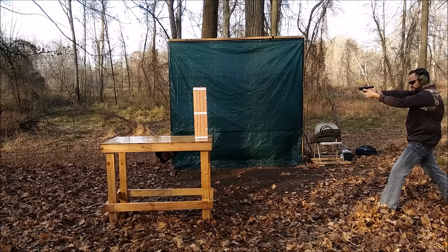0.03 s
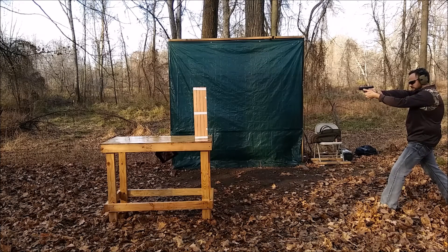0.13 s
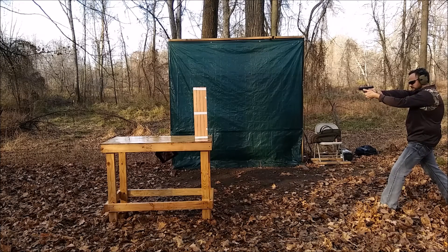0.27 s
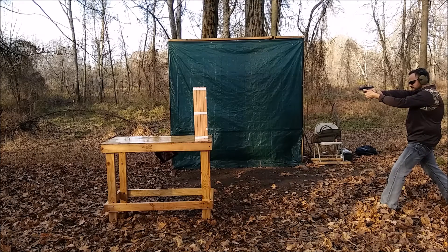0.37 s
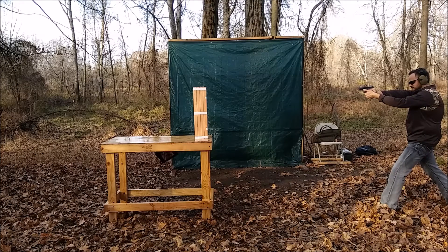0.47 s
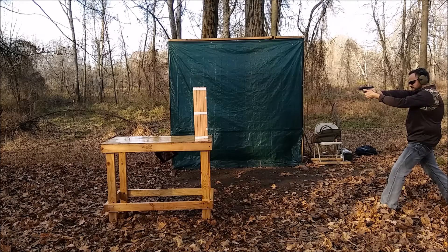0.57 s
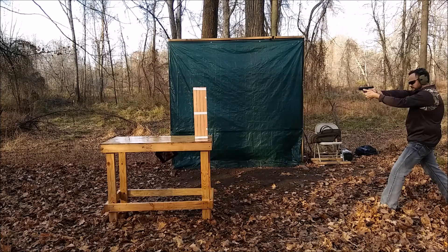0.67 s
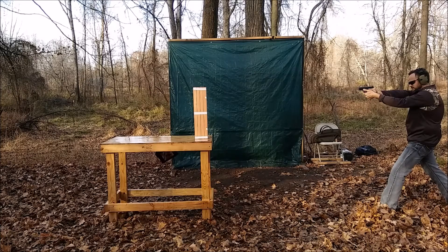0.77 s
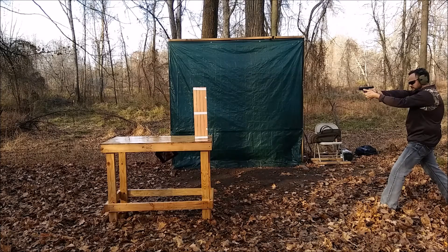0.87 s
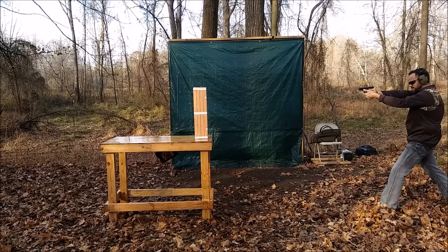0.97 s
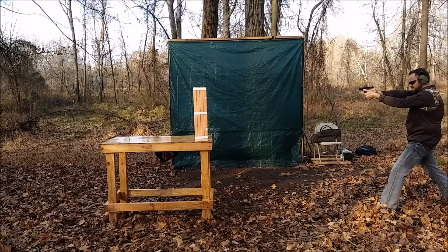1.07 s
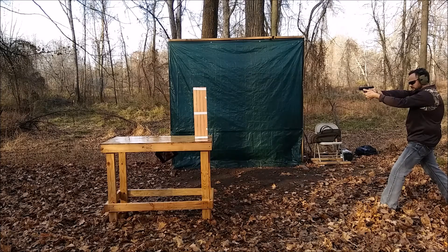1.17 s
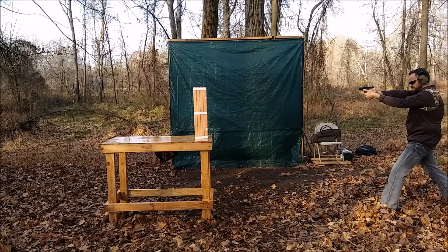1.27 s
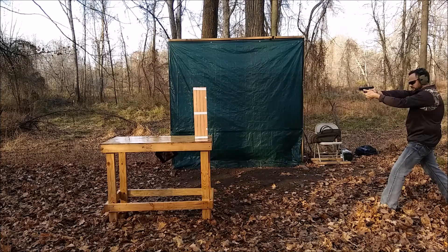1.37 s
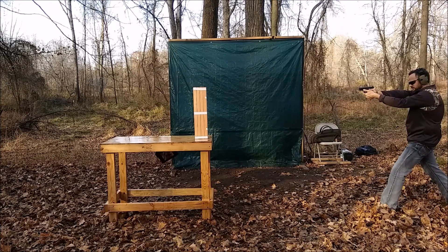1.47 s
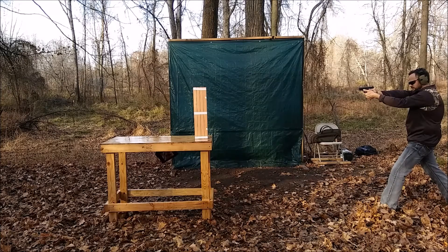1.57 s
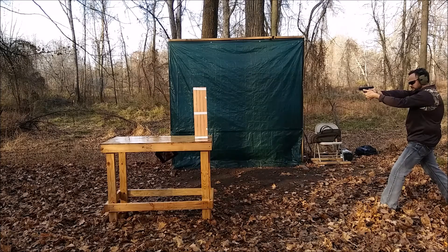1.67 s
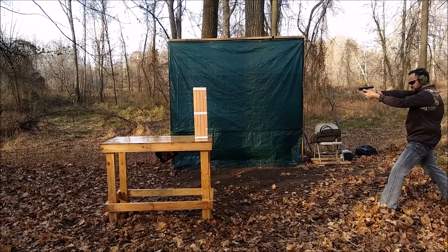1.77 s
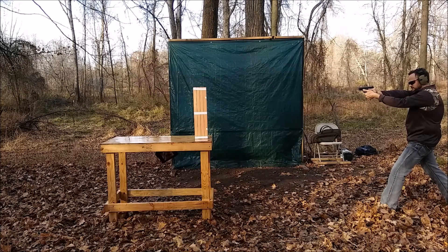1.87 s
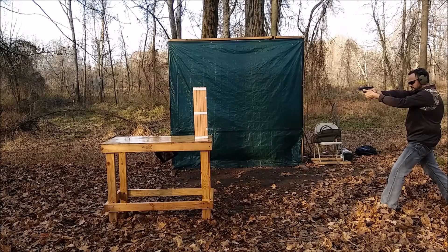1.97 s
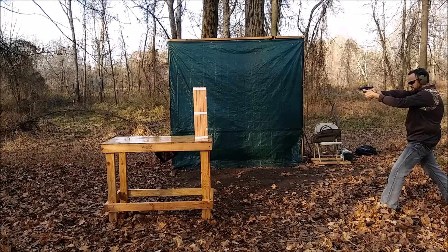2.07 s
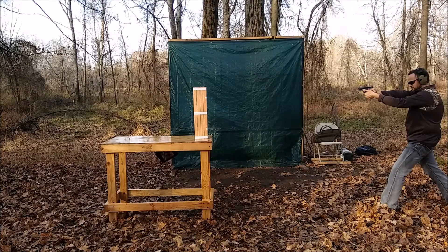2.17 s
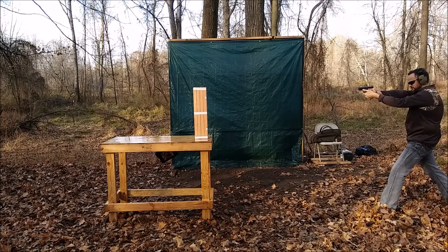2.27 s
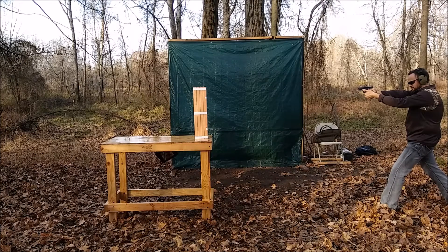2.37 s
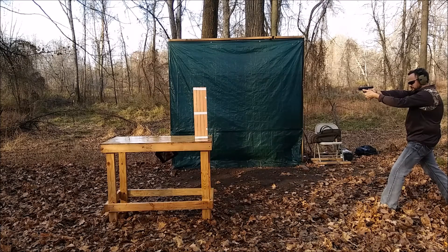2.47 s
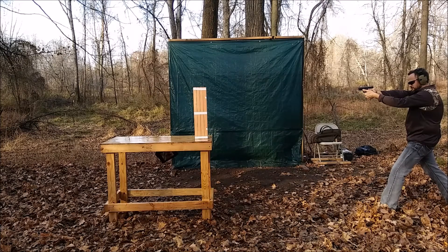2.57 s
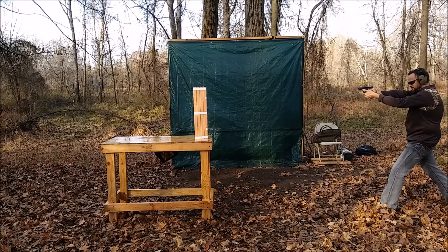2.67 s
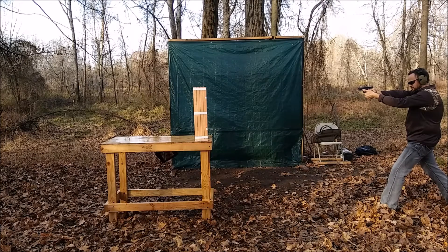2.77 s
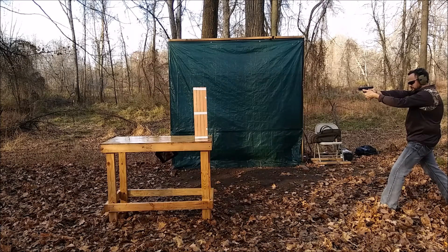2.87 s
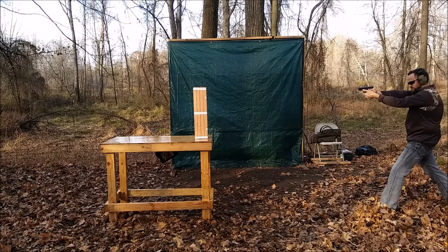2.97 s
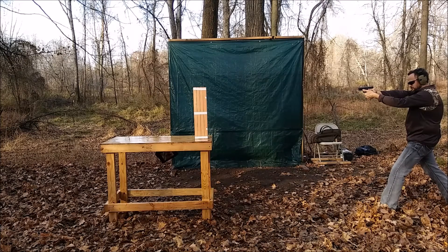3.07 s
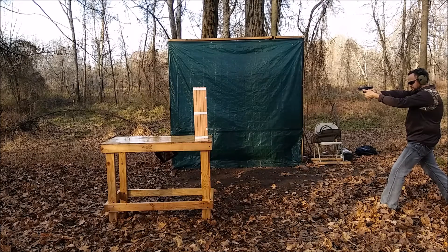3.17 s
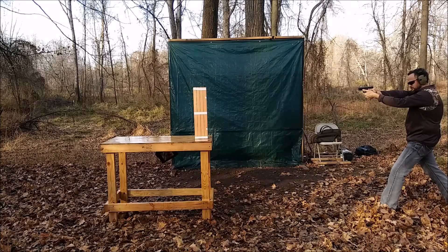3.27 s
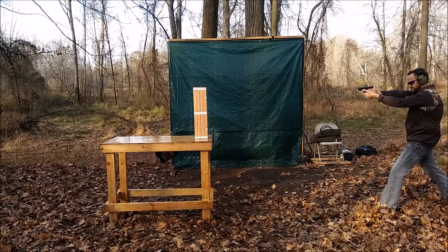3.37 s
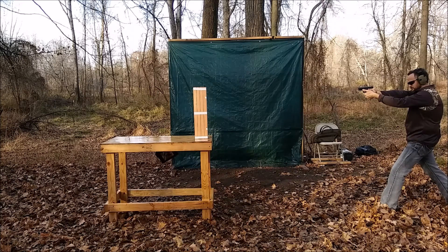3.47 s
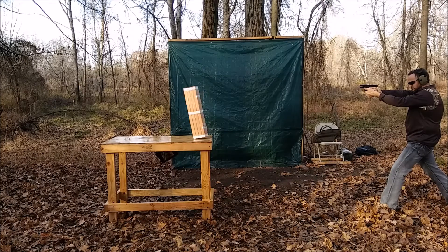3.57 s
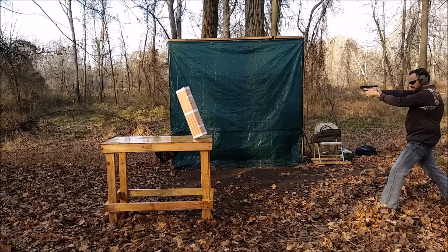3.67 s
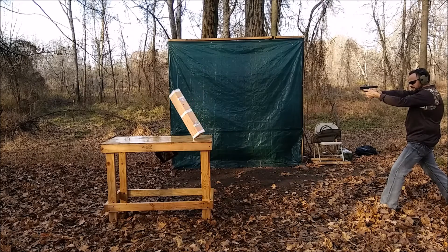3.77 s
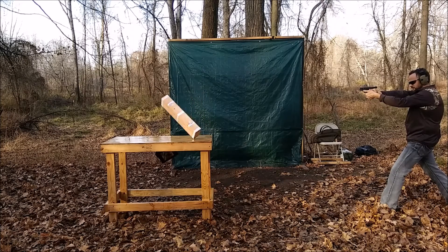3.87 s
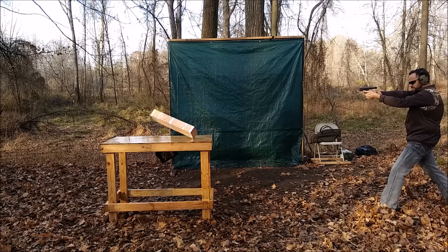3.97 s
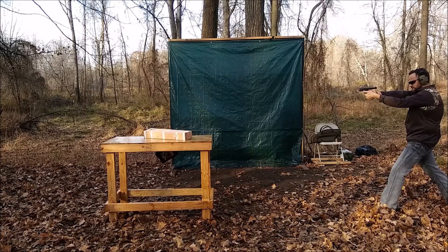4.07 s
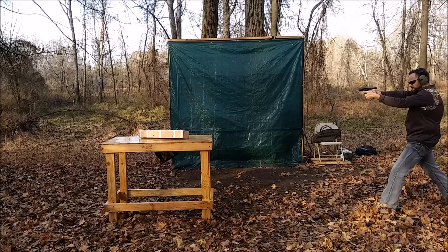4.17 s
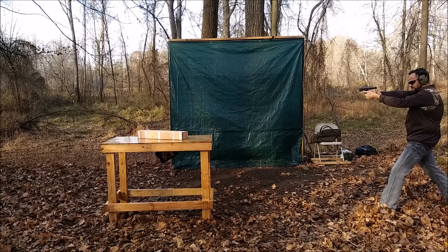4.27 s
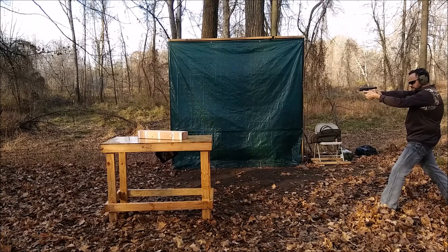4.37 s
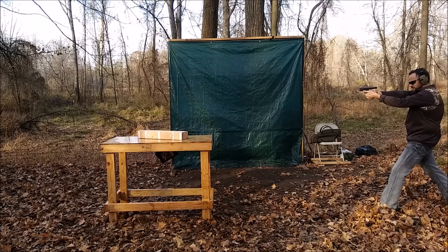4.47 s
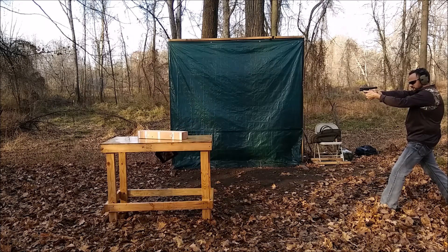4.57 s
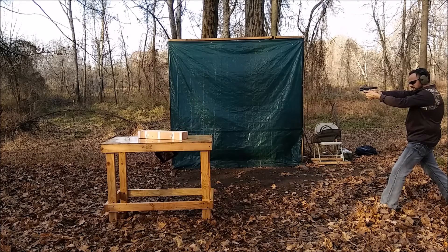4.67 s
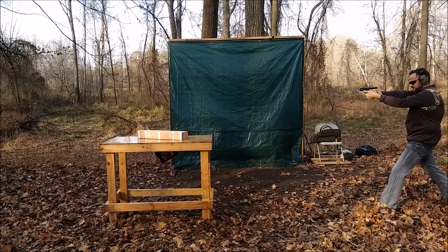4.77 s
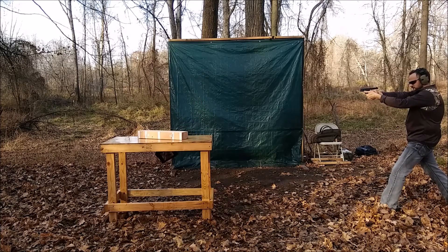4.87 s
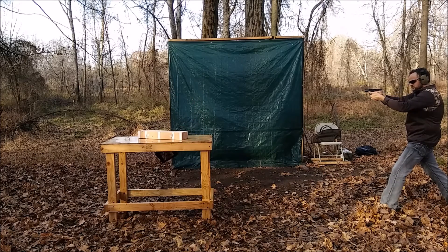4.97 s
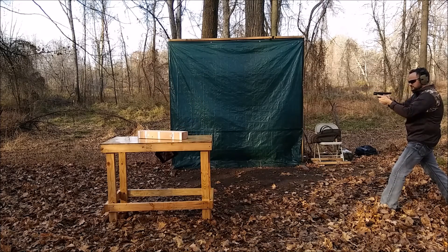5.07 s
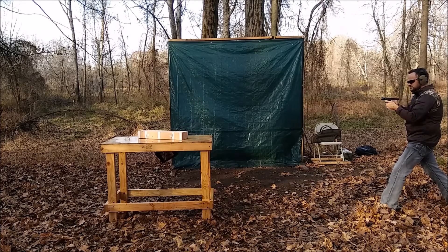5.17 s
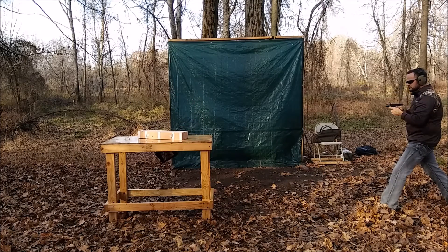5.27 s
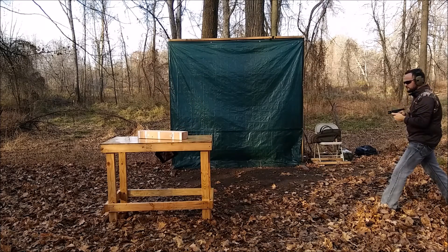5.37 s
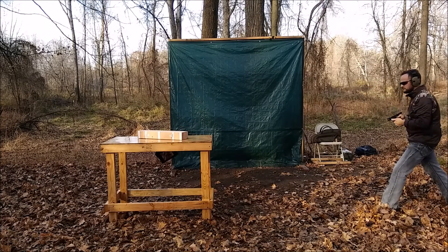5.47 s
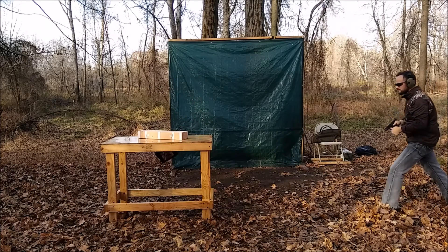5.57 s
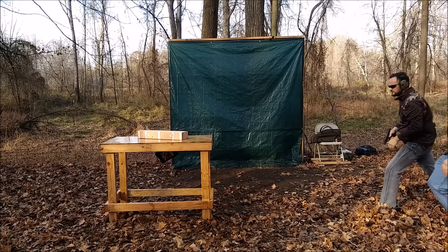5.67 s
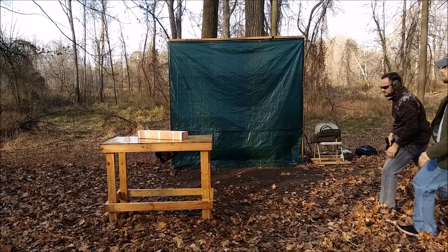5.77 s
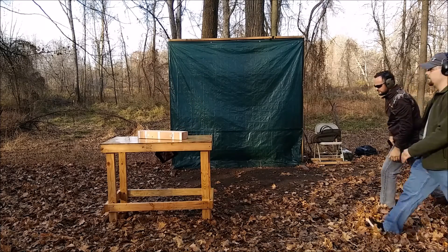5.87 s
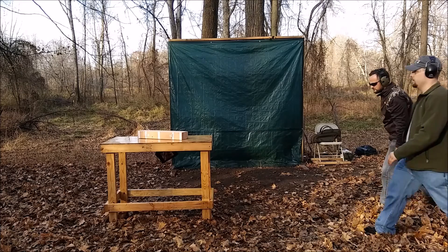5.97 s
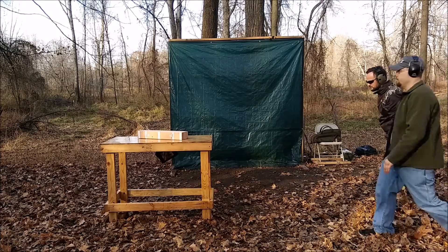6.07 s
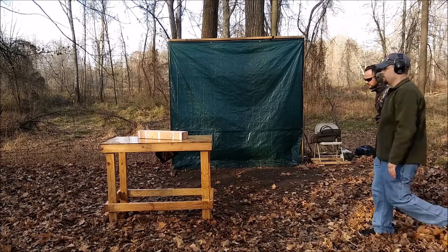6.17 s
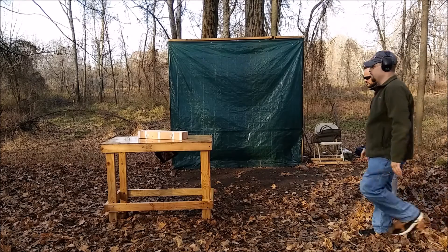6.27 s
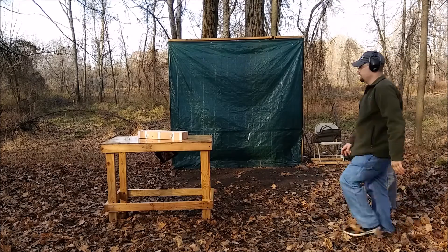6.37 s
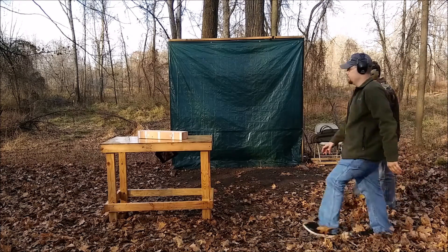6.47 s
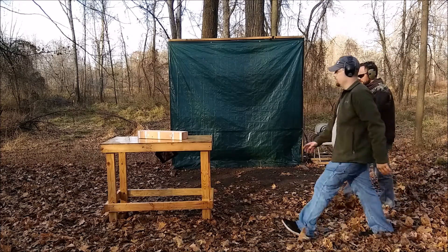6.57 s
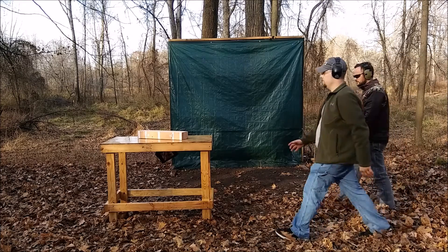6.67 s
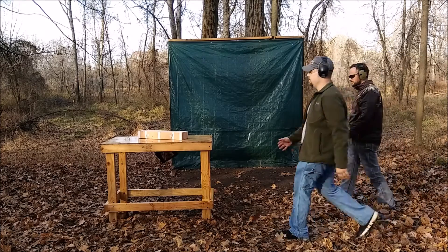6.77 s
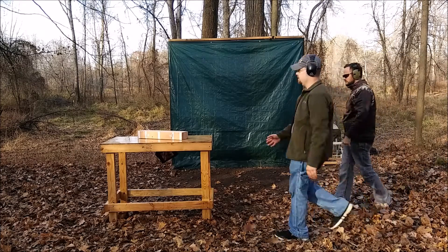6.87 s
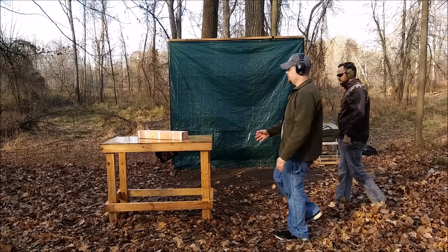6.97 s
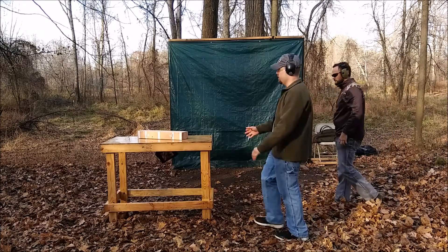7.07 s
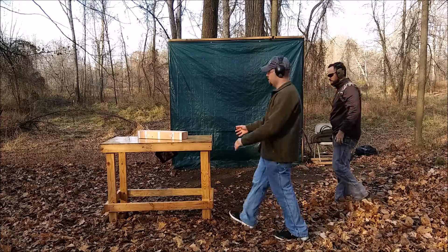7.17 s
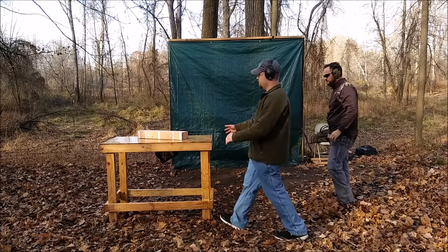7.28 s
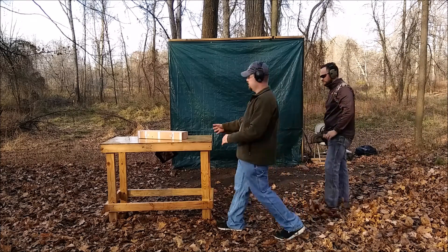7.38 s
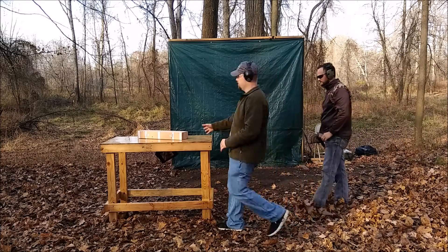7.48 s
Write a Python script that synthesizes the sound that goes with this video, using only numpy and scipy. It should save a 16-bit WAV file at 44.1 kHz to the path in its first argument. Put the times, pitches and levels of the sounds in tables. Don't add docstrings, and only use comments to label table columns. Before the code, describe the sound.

For the first 3.6 seconds a bare wood is almost silent: low still air, faint electronic hiss and a thin steady high buzz from the camera, soft puffs stirring dry leaves, and sparse tiny ticks. At about 3.6 s a single handgun shot bursts out, extremely loud and flattened by the overloaded microphone, with a short low thump. Dense bright echoes from near trunks follow at once, dulling as they decay, while a midrange roll returns from far trees and fades over the next second or more. At 4.2 s a stack of boards topples onto a wooden table: a bright slap, tightly bunched clacks and low thuds, small bounces until 4.4 s. From about 4.7 s leaves rustle lightly; by 5.9 s footsteps crunch and crackle clearly through dry litter, with twig snaps around 6.4 to 6.6 s, a lull near 7 s, then louder scuffs to the end.

```python
import sys
import numpy as np
from scipy import signal
from scipy.fft import rfft, irfft
from scipy.io import wavfile
from scipy.ndimage import uniform_filter1d

SR = 44100
rng = np.random.default_rng(int(sys.argv[2]) if len(sys.argv) > 2 else 0)


def undo_db(level):
    steps = np.asarray(level, float) / 20
    return 10 ** steps


def file_out(sig):
    cols = np.atleast_2d(sig).T
    lim = np.clip(cols, -1, 1)
    pcm = np.round(lim * 32767).astype(np.int16)
    wavfile.write(sys.argv[1], SR, pcm)


N = 332514
SHOT_S = 3.6194


def evened(x):
    return x / np.sqrt(np.mean(x ** 2) + 1e-20)


def read(points, hz):
    f, value = np.transpose(points)
    return np.interp(np.log(hz + 1), np.log(f + 1), value)


def curve(rows):
    return np.interp(np.arange(N) / SR, *np.transpose(rows))


def add(mix, s, sound):
    part = mix[round(s * SR):][:len(sound)]
    part += sound[:len(part)]


def coloured(x, points):
    hz = np.fft.rfftfreq(len(x), 1 / SR)
    inside = (hz > 0.7 * points[0][0]) & (hz < 1.2 * points[-1][0])
    return evened(irfft(rfft(x) * undo_db(read(points, hz)) * inside, len(x)))


def grains(per_s, spread_db, count=N):
    size_db = spread_db * np.minimum(rng.exponential(1, count), 4)
    size = undo_db(size_db) * rng.standard_normal(count)
    return size * (rng.random(count) < per_s / SR)


def flutter(depth_db, ms):
    width = int(ms * SR / 1000)
    slow = uniform_filter1d(rng.standard_normal(N), width)
    return undo_db(depth_db * evened(uniform_filter1d(slow, width)))


def ping(hz, t60, count=1500):
    t = np.arange(count) / SR
    return undo_db(-60 * t / t60) * np.sin(2 * np.pi * hz * t)


def rung(modes, force, spot_db):
    weights = undo_db(spot_db * rng.standard_normal(len(modes))) * rng.choice([-1, 1], len(modes))
    response = np.zeros(8000)
    for weight, (hz, db, t60) in zip(weights, modes):
        response += weight * undo_db(db) * ping(hz, t60, count=8000)
    body = signal.fftconvolve(force, response)
    return body / np.abs(body).max()


def snap(hz, t60, octaves):
    crack = rng.standard_normal(1500) * undo_db(-60 * np.arange(1500) / SR / t60)
    edges = np.clip(hz * 2. ** np.array([-octaves, octaves]), 100, 15000)
    crack = signal.lfilter(*signal.butter(2, edges, "bandpass", fs=SR), crack)
    return crack / np.abs(crack).max()


SWELL_SHAPE = 1.43


def swells(rows):
    s, db, rise, fall = np.array(rows)[:, :4, None].transpose(1, 0, 2)
    since = np.arange(0, N + 64, 64) / SR - s
    return undo_db(db - 10 * np.abs(since / np.where(since < 0, rise, fall)) ** SWELL_SHAPE)


def together(gains):
    return np.interp(np.arange(N) / 64, np.arange(gains.shape[1]), np.linalg.norm(gains, axis=0))


# (frequency [Hz], density [dB per Hz])
AIR_COLOUR = [(30, -24), (58, -1), (90, 2.5), (160, -3), (600, -4.5), (1700, -13), (4000, -16.5),
              (7600, -17), (8400, -28.5), (11000, -21), (15500, -18), (16500, -25.5)]
# (peak [s], level [dB], rise [s], fall [s])
PUFFS = [(.28, -67, .06, .25), (.61, -69, .03, .08), (.89, -62, .15, 0.37), (1.58, -64.5, 0.26, .04),
         (1.84, -62, .08, 0.11), (2.0, -62, 0.15, .03), (2.24, -61.5, .12, 0.041), (2.56, -58, .05, 0.1),
         (2.85, -58.5, .12, 0.061), (3.15, -60.5, .17, .08), (3.38, -63.5, .06, .06), (3.48, -64, .05, .03)]
AIR_DB, WIND_UP_DB, WIND_UP_S = -58.5, 2.5, 4
BREEZE_DB, BREEZE_SMOOTH_S = -4, 0.1


def air():
    still = undo_db(AIR_DB) * coloured(rng.standard_normal(N) * flutter(0.86, 37), AIR_COLOUR)
    rise = (undo_db(WIND_UP_DB) - 1) * np.clip(np.arange(N) / SR - WIND_UP_S, 0, 1)
    still = still + rise * signal.lfilter(*signal.butter(1, 400, fs=SR), still)
    puffs = together(swells(PUFFS))
    low = coloured(rng.standard_normal(N), [(120, -2.5), (300, 5.5), (700, 1), (1300, -12)])
    stir = coloured(grains(3000, 1.9), [(800, 3.0), (2000, 1.5), (4000, -3.5), (7000, 1.0), (12000, -15)])
    breeze = undo_db(BREEZE_DB) * uniform_filter1d(puffs, int(BREEZE_SMOOTH_S * SR))
    return still + breeze * low + puffs * stir


BUZZ_PER_S, BUZZ_HZ = 60, 8010


def buzz():
    fields = np.diff(np.floor(np.arange(N + 1) * BUZZ_PER_S / SR + 0.22))
    clicks = fields * (1 + 0.12 * rng.standard_normal(N))
    burst = ping(BUZZ_HZ, 0.15, count=660) * signal.windows.tukey(660, 0.25)
    ring = evened(signal.oaconvolve(clicks, burst)[:N]) * flutter(1.0, 4)
    tick = coloured(clicks, [(4000, 0), (6000, -7), (7600, -4.0), (8300, -11.5)])
    return undo_db(-68) * ring + undo_db(-75.5) * tick


# (peak [s], crackle [dB], rise [s], fall [s], crunch against crackle [dB])
STEPS = [(4.77, -39, .13, 0.36, -8.5), (5.07, -40.5, 0.091, 0.35, -10), (5.34, -43.5, 0.19, 0.18, -3),
         (5.63, -38.5, 0.11, 0.093, -11), (5.84, -41, 0.066, 0.073, -13), (5.91, -32, 0.023, .05, -13),
         (5.96, -31, 0.076, 0.15, -8.5), (6.32, -35.5, 0.3, 0.14, -11.5), (6.44, -39.5, 0.093, 0.17, -6),
         (6.585, -32.5, 0.096, .07, -8.5), (6.7, -38, 0.15, 0.26, -10.5), (6.96, -41.5, 0.14, .07, -10.5),
         (7.24, -40, 0.073, 0.11, -10.5), (7.37, -33, 0.11, 0.14, -10.5), (7.5, -32, 0.15, 0.12, -9)]
# (frequency [Hz], density [dB per Hz])
CRACKLE_COLOUR = [(1760, -42), (3000, -7), (4290, -6.5), (6250, -0.5), (7290, -3), (8380, -10.5),
                  (10900, -13.5), (15200, -20.5), (16000, -23)]
# (frequency [Hz], density [dB per Hz])
CRUNCH_COLOUR = [(150, -14.5), (300, -5.5), (700, -7), (1500, -2), (2500, -2.5), (3500, -7), (5000, -4)]
# (time [s], level [dB], pitch [Hz])
SNAPS = [(4.776, -11, 5950), (5.6343, -17.5, 6460), (5.832, -20.5, 7550), (5.8709, -21, 6700),
         (5.9054, -24, 5670), (6.4137, -9, 6230), (6.52, -18, 6160), (6.584, -9, 5460), (6.728, -18, 6230),
         (6.893, -33, 5910), (7.0203, -40, 6320)]
# (time [s], level [dB], pitch [Hz])
TICKS = [(0.0533, -46, 6960), (0.2329, -51, 1970), (0.602, -46, 3570), (1.395, -38, 6860),
         (1.4641, -43, 4300), (1.4945, -49, 6440), (1.8193, -41, 4000), (1.9939, -48, 3530),
         (2.7826, -45, 3490), (2.832, -47, 7030), (3.0769, -44, 6380), (3.4446, -47, 3710)]
LITTER_DB = -48
FAINT_TICKS, FAINT_DB = 18, -53


def leaves():
    settling = undo_db(LITTER_DB) * np.clip((np.arange(N) / SR - 4.6) / 0.085, 0, 1)
    crackle = coloured(grains(12000, 0.9) * flutter(0.91, 15), CRACKLE_COLOUR)
    crunch = coloured(grains(8000, 0.8) * flutter(0.93, 25), CRUNCH_COLOUR)
    feet = swells(STEPS)
    weight = undo_db(np.array(STEPS)[:, 4:] + 4.0)
    crackle_gain = np.hypot(undo_db(0.5) * together(feet), settling)
    crunch_gain = np.hypot(together(weight * feet), undo_db(-5) * settling)
    out = crackle_gain * crackle + crunch_gain * crunch
    for s, db, hz in SNAPS:
        add(out, s, undo_db(db - 10.5) * snap(hz, 0.021, octaves=0.22))
    ticks = list(TICKS)
    for s, size_db, octaves_up in rng.random((FAINT_TICKS, 3)) * [SHOT_S, 6, 2.3]:
        ticks.append((s, FAINT_DB + 5.5 - size_db, 1500 * 2 ** octaves_up))
    for s, db, hz in ticks:
        add(out, s, undo_db(db - 4.5) * snap(hz, 0.03, octaves=0.32))
    return out


# (time [s], blow [dB], slap [dB], table-top thud [dB], spread [s])
FALLS = [(4.1898, 2, 7, -14, 0.0025), (4.194, -5, -3, -10, 0.0031), (4.2, 5, -6.5, -11, 0.0088),
         (4.207, -7, -11, -14, 0.0054), (4.219, -1, -5, -16, 0.0043), (4.223, -3, 3, -7, 0.0029),
         (4.232, -4.5, -7, -7.5, 0.0063), (4.262, -29, -16, -12, 0.013), (4.288, -24, -15, -16, 0.013),
         (4.3127, -5.5, -9.5, -11.5, 0.0045), (4.322, -6.5, -22, -15, 0.01), (4.354, -17, -17, -30, 0.0047),
         (4.362, -7, -18, -6, 0.0042), (4.368, -3.5, -18, -25, .002), (4.411, -27, -23, -18.5, 0.011)]
# (frequency [Hz], level [dB], t60 [s])
BOARD_MODES = [(490, 1.5, 0.026), (616, -4.5, 0.055), (794, 0.5, 0.053), (896, 3, 0.068), (936, -9, 0.046),
               (997, -2.5, 0.034), (1100, -0.5, 0.021), (1212, -2, 0.03), (1404, 3, 0.016),
               (1790, -8.5, 0.043), (2180, -12, 0.036)]
# (frequency [Hz], level [dB], t60 [s])
TOP_MODES = [(128, -14.5, 0.16), (157.3, -5, 0.093), (184.6, -8, 0.19), (227.6, 3.5, 0.09),
             (305, -2.5, 0.064), (384, 0.5, 0.11), (440, -8, 0.053)]


def boards():
    out, t = np.zeros(N), np.arange(3000) / SR
    slap_band = signal.butter(3, [1200, 4300], "bandpass", fs=SR)
    for s, blow_db, slap_db, thud_db, spread in FALLS:
        rattle = rng.standard_normal(len(t)) * np.exp(-t / spread) * np.minimum(t / (0.23 * spread), 1)
        knock = rattle + 2.19 * np.exp(-t / 0.00016)
        add(out, s, undo_db(blow_db) * rung(BOARD_MODES, knock, 3.6))
        add(out, s, undo_db(thud_db) * rung(TOP_MODES, np.exp(-t / 0.00028), 0.93))
        slap = signal.lfilter(*slap_band, knock)
        add(out, s, undo_db(slap_db) * slap / np.abs(slap).max())
    add(out, FALLS[0][0], undo_db(-8) * snap(10000, 0.009, octaves=0.7))
    add(out, FALLS[1][0], undo_db(-22) * snap(11000, 0.012, octaves=0.6))
    out = signal.sosfilt(signal.butter(5, 100, "highpass", fs=SR, output="sos"), out)
    tail = rng.standard_normal(SR // 2) * undo_db(-60 * np.arange(SR // 2) / SR / 0.49)
    tail = signal.lfilter(*signal.butter(1, 5000, fs=SR), tail)
    return out + undo_db(-16.0) * signal.fftconvolve(out, tail / np.linalg.norm(tail))[:N]


# (frequency [Hz], density at the shot [dB per Hz])
NEAR_COLOUR = [(30, -41), (100, -26.5), (250, -7), (700, -1), (1500, -7.5), (2500, -5.5), (5000, 0),
               (7000, -1.5), (9000, -10), (16000, -26.5)]
# (frequency [Hz], t60 [s])
NEAR_T60 = [(50, .4), (150, 1.1), (700, 3.4), (2000, 2.12), (4000, 1.52), (6500, 1.16), (9000, 0.71),
            (12000, 0.62), (15500, .6)]
NEAR_DB = -3.5


def near_trunks():
    echoes = coloured(rng.standard_normal(3 * SR), NEAR_COLOUR)
    hz, t, z = signal.stft(echoes, SR, nperseg=256)
    decay = undo_db(-60 * t / read(NEAR_T60, hz)[:, None])
    echoes = signal.istft(z * decay, SR, nperseg=256)[1]
    t = np.arange(len(echoes)) / SR
    first_db = 14 * np.exp(-t / 0.025)
    return undo_db(NEAR_DB + first_db) * echoes * np.minimum(t / 0.0015, 1)


# (time [s], level [dB])
ROLL = [(3.64, -6.5), (3.75, -10), (4.04, -12.5), (4.12, -17), (4.46, -24), (4.8, -38.5), (5.25, -45),
        (5.55, -37.5), (5.92, -47)]
# (frequency [Hz], density [dB per Hz])
EARLY_COLOUR = [(120, -42), (200, -13.5), (385, -5), (420, -8), (454, -0.5), (594, -2.5), (771, 1),
                (1140, -2.5), (1260, -4.5), (2000, -21.5), (2600, -57), (4400, -120)]
# (frequency [Hz], density [dB per Hz])
ROLL_COLOUR = [(150, -26.5), (280, -15.5), (400, -2.5), (550, 3), (800, 1), (1000, -4.5), (1300, -9),
               (2200, -19), (3000, -25)]
ROLL_END_DB_PER_S = 12.5
CLUMPS_DB, CLUMPS_AT_S, CLUMPS_FOR_S = 2, 1.0, 0.29


def far_roll():
    t = np.arange(N) / SR
    since = t - SHOT_S
    early_db = 12 * np.exp(-(since / 0.055) ** 2)
    roll_db = curve(ROLL) + early_db - ROLL_END_DB_PER_S * np.maximum(t - ROLL[-1][0], 0)
    trunks = grains(6000, 0.93)
    far = np.clip(since / 0.59, 0, 1)
    roll = (1 - far) * coloured(trunks, EARLY_COLOUR) + far * coloured(trunks, ROLL_COLOUR)
    roll = evened(roll * flutter(1.0, 7.6))
    roll = roll * flutter(CLUMPS_DB, 13) ** np.exp(-((since - CLUMPS_AT_S) / CLUMPS_FOR_S) ** 2)
    thump = coloured(rng.standard_normal(N), [(60, -12), (150, -4.5), (300, 0.5), (450, 0.5)])
    thump = undo_db(-13.5 - 60 * np.abs(since) / 1.14) * np.clip(since / 0.041, 0, 1) * thump
    arrival = np.clip((since - 0.009) / 0.0055, 0, 1)
    return arrival * (undo_db(roll_db) * roll + thump)


def shot():
    u = np.arange(400) / SR / 0.00044
    blast = (1 - u) * np.exp(-u)
    out = far_roll()
    add(out, SHOT_S, undo_db(6) * blast)
    add(out, SHOT_S, near_trunks())
    add(out, SHOT_S, undo_db(-16.5) * ping(26, 0.27, count=12000))
    return out


def scene():
    return (air() + buzz() + leaves() + boards() + shot())[None]


# (time [s], kept from [Hz], kept up to [Hz])
STARVED = [(.193, 0, 900), (.9607, 0, 1200), (1.8141, 0, 5500), (1.8997, 0, 3000), (2.3249, 0, 2800),
           (2.5179, 0, 900), (3.1797, 0, 1200), (3.2639, 0, 2000), (4.1186, 0, 6000), (5.2056, 0, 7000),
           (5.3754, 0, 8000), (5.6105, 300, 8000), (5.6541, 0, 8000), (6.3797, 3000, 9500),
           (7.358, 3000, 8000), (7.379, 3000, 8000), (7.4667, 1000, 8000)]


def starved(x):
    size = 1882
    window = np.sin(np.pi * np.arange(size) / size)
    hz = np.fft.rfftfreq(size, 1 / SR)
    out = x.copy()
    for s, low_hz, high_hz in STARVED:
        start = round(s * SR) - size // 2
        stray = np.repeat(rng.random(120) < 0.17, 8)[:len(hz)] & (hz < 11000) & (hz > 500)
        stray = stray | (abs(hz - BUZZ_HZ) < 120)
        thinned = np.repeat(rng.random(120) < 0.25, 8)[:len(hz)] & (hz > 900)
        strong = (hz > low_hz) & (hz < high_hz)
        lost = np.where(strong, thinned, ~stray) & (hz < 15200)
        out[start:start + size] -= window * irfft(rfft(window * x[start:start + size]) * lost, size)
    return out


def low_pass(x):
    return signal.sosfilt(signal.butter(12, 16100, fs=SR, output="sos"), x)


def record(dry):
    dry = signal.sosfilt(signal.butter(2, 22, "highpass", fs=SR, output="sos"), dry)
    clipped = dry / (1 + np.abs(dry) ** 12) ** (1 / 12)
    ceiling = 0.87 + 0.05 * np.exp(-np.abs(np.arange(N) / SR - SHOT_S) / 0.1)
    lowpass = signal.firwin(511, 15900, window=("kaiser", 9), fs=SR)
    smooth = signal.oaconvolve((ceiling * clipped)[0], lowpass, "same")
    return low_pass(starved(smooth)[None])


dry = scene()
out = record(dry)
file_out(out)
```